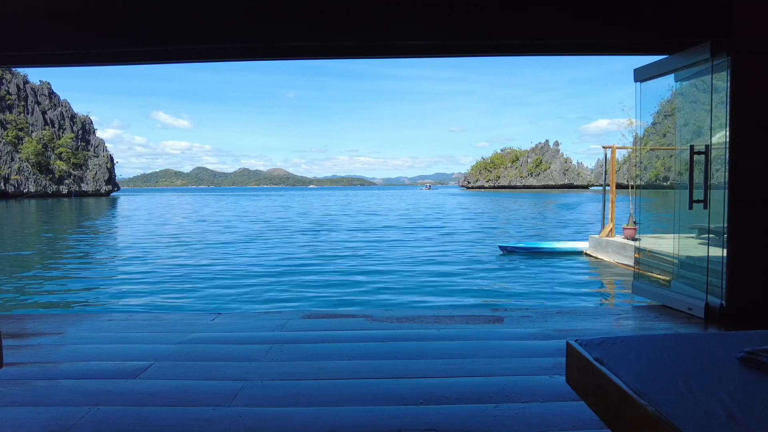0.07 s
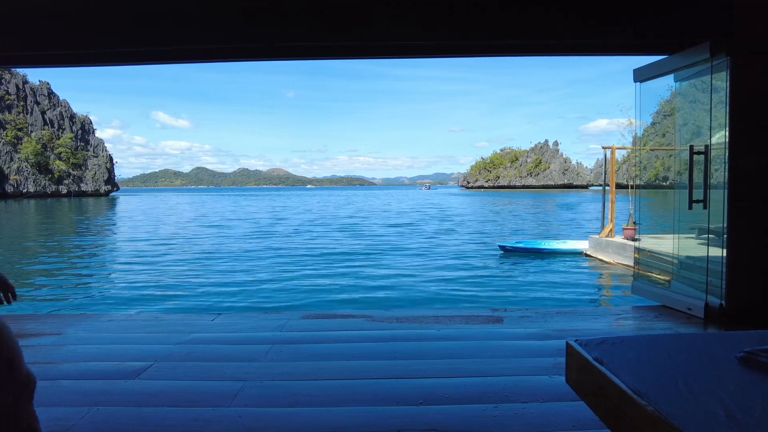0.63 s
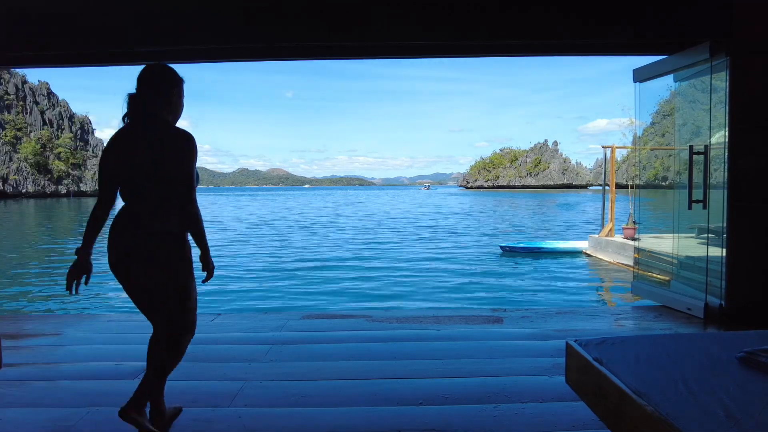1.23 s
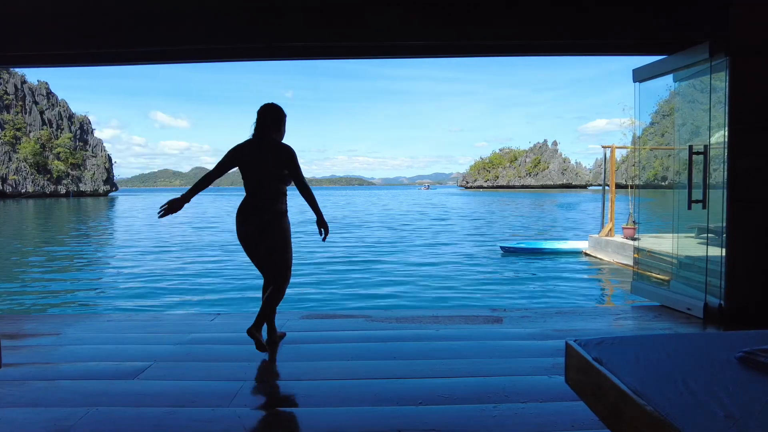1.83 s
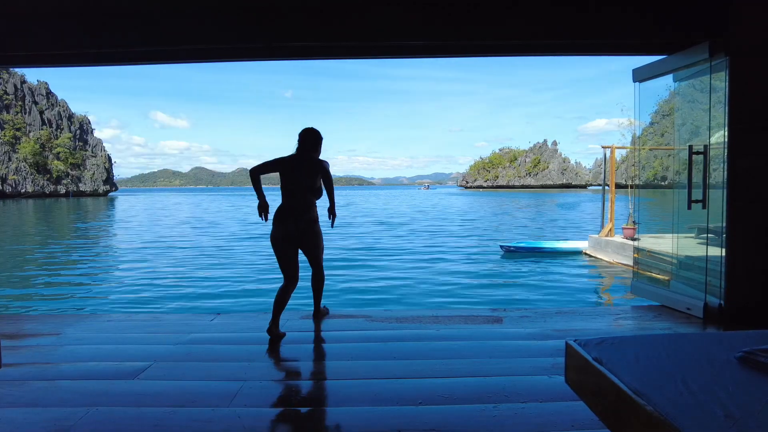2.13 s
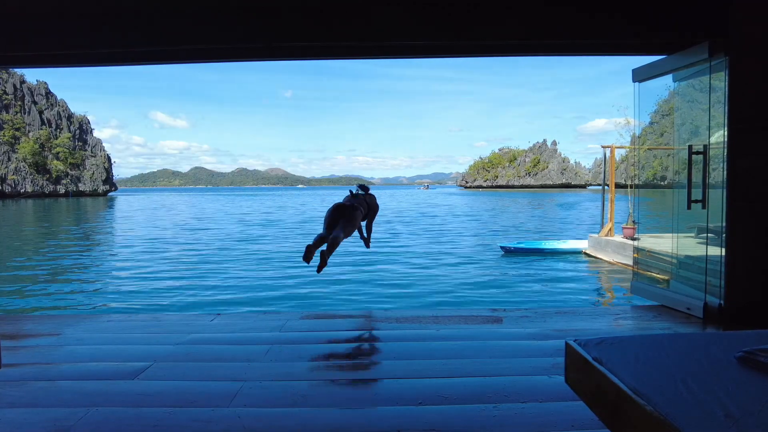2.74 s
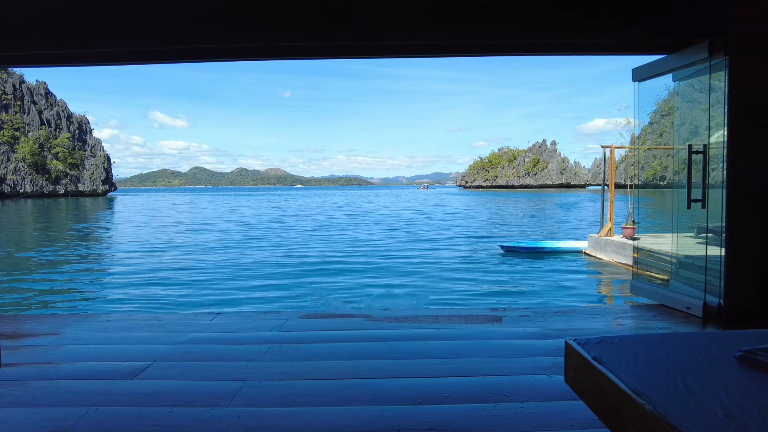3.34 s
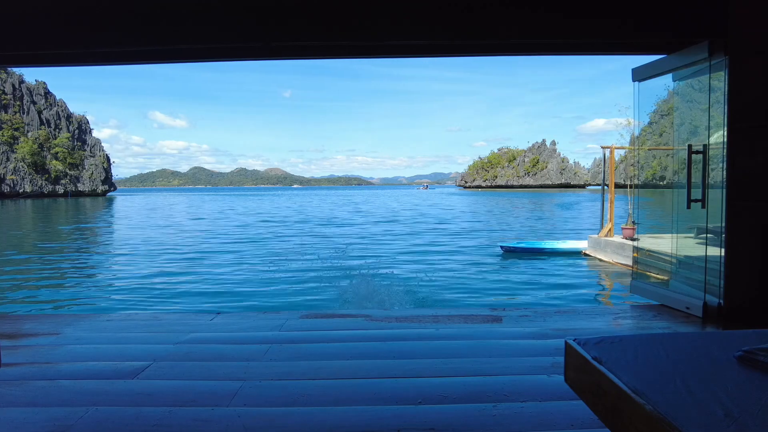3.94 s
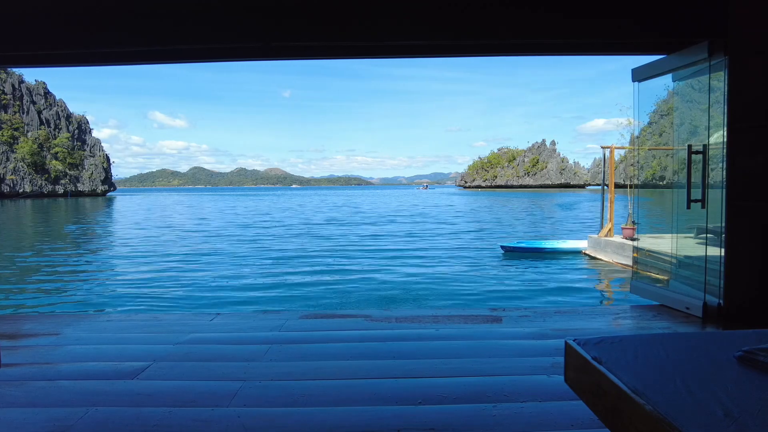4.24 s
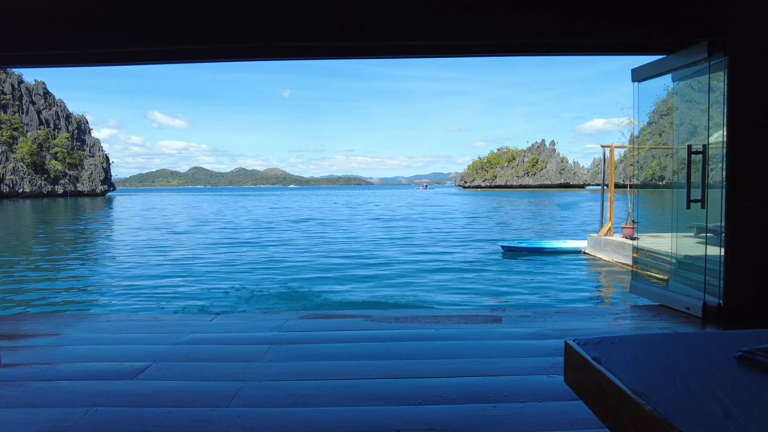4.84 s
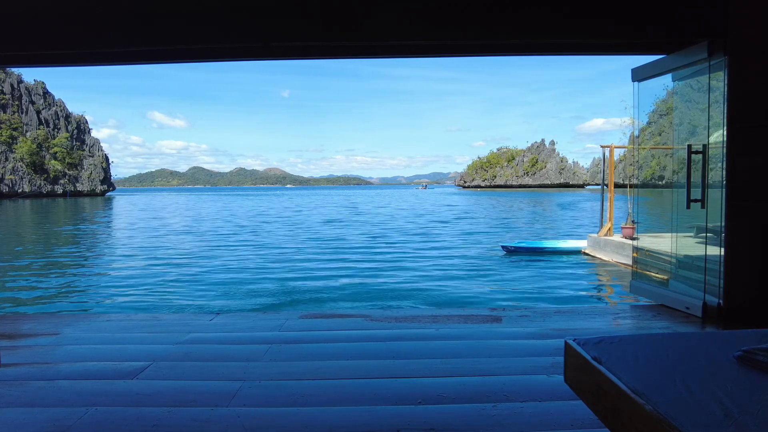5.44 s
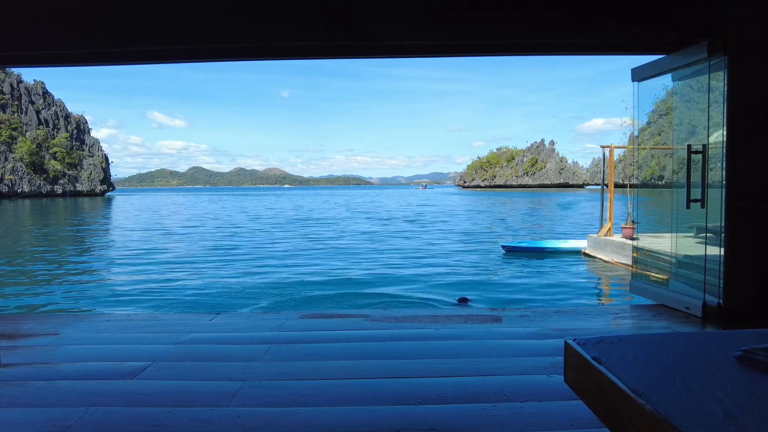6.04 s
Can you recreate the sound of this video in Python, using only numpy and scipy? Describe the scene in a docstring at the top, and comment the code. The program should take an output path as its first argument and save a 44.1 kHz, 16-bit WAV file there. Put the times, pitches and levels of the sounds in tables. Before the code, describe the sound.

Soft lapping under a wooden deck and a faint, low generator hum continue throughout. At about 0.2 to 0.4 seconds come sharp clacks, like something set down on the boards. From 0.7 seconds bare feet run across the deck with hollow thumps and light, wet slaps, heaviest around 1.9 to 2.3 seconds and ending near 2.8. At 3.1 seconds a diver slices into the water, and at 3.2 the air pocket claps shut with a loud, deep boom and gulp. More booms and gulps follow around 3.5 to 3.6 seconds amid churning bubbles. Spray rains back, swelling at about 4.3 to 4.5 seconds, then fades into fine fizzing foam. Scattered bubbles and small gurgles continue until about 6 seconds, with the hum slightly stronger around 5. The roof over the deck adds a short echo.

```python
"""A dive from a floating house

Sharp clacks sound, like something set down on a wooden deck; then bare feet run up and dive into a lagoon.
The body slices in, the air pocket behind it claps shut and gulps, spray rains back and foam fizzes out.
A generator hums faintly, wavelets lap under the boards, and the roof over the deck echoes."""
import sys
import numpy as np
from scipy import signal
from scipy.fft import rfft, irfft, next_fast_len
from scipy.io import wavfile
from scipy.ndimage import map_coordinates

SR = 44100
rng = np.random.default_rng(int(sys.argv[2]) if len(sys.argv) > 2 else 0)


def digitize_waveform(pressure):
    """Quantize a signal to 16-bit integers and store it at the path in sys.argv[1].

    Rows of a 2-D input are taken as channels; values are limited to [-1, 1].
    """
    field = np.atleast_2d(pressure).T
    bounded = np.clip(field, -1, 1)
    quanta = np.round(bounded * 32767).astype(np.int16)
    wavfile.write(sys.argv[1], SR, quanta)


N = 267863

# the air pocket behind the diver collapses: (time [s], boom level [dB], rise [s], clap level [dB])
COLLAPSES = [(3.2094, -4.5, 0.0058, -27.5), (3.447, -38, 0.011, -29.5), (3.486, -15, 0.0048, -32),
             (3.561, -10.5, 0.0091, -25)]
# stirred water boils over the diver, swells as spray rains back, then settles:
# (time [s], level [dB], fineness [dB]); low fineness means big bubbles, high means fine drops
WASH = [(3.12, -49.5, 6.5), (3.19, -38, -2.5), (3.3, -35.5, -2), (3.43, -40, -5), (3.5, -33.5, -2.5),
        (3.66, -40.5, -1.5), (3.8, -41, 1), (4.0, -44.5, 1.5), (4.3, -34, 1.5), (4.52, -37.5, 3.5),
        (4.65, -46, 1.5), (4.9, -50, -3), (5.08, -54, 0), (5.25, -60.5, 0.5), (5.65, -74.5, 6.5),
        (6.07, -82.5, 10)]
BUBBLE_T60, BUBBLE_GLIDE = 0.07, 0.18  # a t60 is the seconds taken to fade by 60 dB; pitch climbs 18 %
SLAP_RISE = 0.017  # rise as a share of length: a long scuff starts more softly than a tap


def amp(db):
    """Turn decibels into a gain."""
    return 10 ** (np.asarray(db) / 20)


def unit(x):
    """Scale to an average (rms) level of 1."""
    return x / np.sqrt(np.mean(x ** 2) + 1e-20)


def along(points, hz):
    """Read between (frequency, value) points on a log frequency scale."""
    freqs, values = np.transpose(points)
    return np.interp(np.log(hz + 1), np.log(freqs + 1), values)


def curves(rows):
    """One value per sample for each column after the time."""
    times, *columns = np.transpose(rows)
    return [np.interp(np.arange(N) / SR, times, column) for column in columns]


def wobble(rate):
    """A smooth curve through rate random values a second."""
    return map_coordinates(rng.standard_normal(int(N * rate / SR) + 4), [np.arange(N) * rate / SR])


def noise():
    """Two unrelated white noises."""
    return rng.standard_normal((2, N))


def add(track, s, sound):
    """Mix a sound into the track at s seconds."""
    part = track[..., round(s * SR):][..., :sound.shape[-1]]
    part += sound[..., :part.shape[-1]]


def filtered(x, response):
    """Multiply each frequency in x by response(hz)."""
    size = next_fast_len(N + SR // 4)
    return irfft(rfft(x, size) * response(np.fft.rfftfreq(size, 1 / SR)), size)[..., :N]


def fade(t60, rise):
    """A one-second loudness shape that rises quickly and dies away."""
    t = np.arange(SR) / SR
    return np.exp(-np.log(1000) * t / t60) * (1 - np.exp(-t / rise))


def ring(hz, t60, rise, glide=0):
    """A fading tone whose pitch climbs by the share glide."""
    t = np.arange(SR) / SR
    pitch = hz * (1 + glide * np.minimum(t / t60, 1))
    return fade(t60, rise) * np.sin(2 * np.pi * np.cumsum(pitch) / SR)


def spread(pair, colour, hollow_db=0):
    """Make two signals into stereo of level 1, shaped by a colour: (frequency [Hz], level [dB])."""
    # the gap under the deck rings, as much as hollow_db asks: (pitch [Hz], width [Hz], strength [dB])
    hollow = [(397.6, 68, 11), (508, 23, 2), (1013, 31, 9), (1236, 67, -3), (1458, 25, 2),
              (1737, 210, -8.5), (2636, 33, 0.5), (2960, 200, -12.5)]
    # how alike the two ears are: (frequency [Hz], likeness [0 to 1])
    likeness = [(100, .99), (300, 0.92), (550, 0.83), (1000, 0.33), (2000, 0.83), (4000, 0.28),
                (12000, 0.43)]

    def response(hz):
        angle = np.arccos(np.clip(along(likeness, hz), -1, 1)) / 2
        lift = sum(amp(db / 2) / (1 + (2 * (hz - centre) / width) ** 2) for centre, width, db in hollow)
        return amp(along(colour, hz) + hollow_db * lift) * [np.cos(angle), np.sin(angle)]
    mid, side = filtered(pair, response)
    return unit(np.array([mid + side, mid - side]))


def swarm(count, lo_hz, hi_hz, cycles, size_db, glide):
    """Two streams of bubbles at random times, each ringing for some cycles; size_db varies their level."""
    when, pitch, size, stream = rng.random((count, 4)).T
    hz = lo_hz * (hi_hz / lo_hz) ** pitch[:, None]
    samples = np.arange(int(cycles * SR / lo_hz) + 2)
    age = samples * hz / SR / cycles
    wave = np.sin(2 * np.pi * cycles * age * (1 + glide * age / 2)) * age * np.exp(-2 * np.pi * age)
    wave *= amp(-size_db * np.log(np.maximum(size, 1 / 100)))[:, None]
    start = (when * N).astype(int) + N * (stream > .5)
    summed = np.bincount((start[:, None] + samples).ravel(), wave.ravel(), 2 * N)
    return unit(summed[:2 * N].reshape(2, N))


def roof_echo(x):
    """Roof and walls echo 8 ms later; the open front lets the bass escape."""
    # how long the echo lasts: (frequency [Hz], t60 [s])
    decay = [(150, 0.33), (600, 0.32), (2500, 0.31), (12000, 0.25)]
    hz, t, spectrum = signal.stft(rng.standard_normal((2, SR // 2)), SR, nperseg=256)
    mid, side = signal.istft(spectrum * amp(-60 * t / along(decay, hz)[:, None]), SR, nperseg=256)[1]
    tail = mid + 0.76 * np.array([side, -side])
    echo = signal.fftconvolve(x.mean(axis=0)[None], tail / np.linalg.norm(tail[0]), axes=1)[:, :N]
    return filtered(echo, lambda hz: hz ** 2 / (hz ** 2 + 300 ** 2) * np.exp(-2j * np.pi * hz * .008))


def calm_lagoon():
    """Wavelets under the deck and distant air blend into a soft, even noise."""
    # its colour: (frequency [Hz], level [dB])
    colour = [(22, -6.5), (55, -1), (100, -2.5), (170, -12), (260, -30.5), (400, -25.5), (640, -18.5),
              (780, -35.5), (950, -31), (1150, -37.5), (1450, -35), (2200, -42), (5000, -46.5),
              (16000, -59)]
    return amp(-49.5 + 0.3 * wobble(5.02)) * spread(noise(), colour, hollow_db=4.5)


def generator():
    """A generator hums, now fainter, now louder, its pitch wandering slightly."""
    # the hum's tones: (pitch [Hz], level [dB])
    tones = [(55, -46.5), (110, -71.5), (166, -85)]
    # its swell: (time [s], gain [dB])
    swell = [(0, -7.5), (3, -4.5), (4.2, -4), (4.8, 1), (5.3, 0.5), (5.6, -7.5), (6.07, -1.5)]
    uneven_time = np.cumsum(1 + .01 * wobble(2)) / SR
    hum = sum(amp(db) * np.sqrt(2) * np.sin(2 * np.pi * hz * uneven_time) for hz, db in tones)
    return hum * amp(curves(swell)[0] + .5 * wobble(11))


def wavelets(bubbles_each):
    """Each wavelet traps a small cluster of bubbles of about one size."""
    # gurgles against the deck: (time [s], level [dB], pitch [Hz])
    gurgles = [(.135, -46, 560), (3.95, -42, 1950), (4.666, -38, 1080), (4.96, -40, 576), (5.17, -49, 1640),
               (5.235, -48, 600), (5.356, -47.5, 1500), (5.47, -49.5, 460), (5.72, -62.5, 3090),
               (5.79, -59, 1810), (5.86, -59, 910)]
    length_s, fall_db = 0.054, 5
    out = np.zeros(N)
    for s, db, hz in gurgles:
        for k in range(bubbles_each):
            age = (k + rng.random()) / bubbles_each
            pitch = hz * np.exp(.085 * rng.standard_normal())
            bubble = ring(pitch, BUBBLE_T60, rise=0.0026, glide=BUBBLE_GLIDE)
            add(out, s + age * length_s, amp(db - fall_db * age) * bubble)
    return out


def deck_thumps():
    """Each hit rings the deck at its own spot: a soft one moves the beams, a quick one the planks."""
    # an opening clack, then footsteps: (time [s], level [dB], hardness [Hz]); little rings above that
    hits = [(0.242, -25, 440), (0.737, -26, 37), (0.786, -29.5, 55), (.836, -27.5, 55.3), (1.167, -35, 40),
            (1.224, -31, 140), (1.516, -37.5, 69), (1.574, -40, 172), (1.697, -34, 45), (1.787, -32, 80),
            (1.852, -16.5, 159), (2.116, -29.5, 45), (2.218, -22, 111), (2.328, -24, 77.4),
            (2.64, -37, 168)]
    # the tones of beams and planks: (pitch [Hz], level [dB], t60 [s])
    deck = [(30.53, 5.5, 1), (41, -2.5, 0.3), (51.2, -14, 0.44), (68.66, -4, 1), (86.14, -1.5, 0.59),
            (101, -6, 0.34), (129, -2, 0.26), (170.8, -11, 0.61), (198.3, -10, 0.37), (222.4, -23.5, 0.67),
            (234, -20.5, 0.25), (314, -22, 0.29)]
    out = np.zeros(N)
    for s, db, hard_hz in hits:
        for hz, level, t60 in deck:
            drive = hz / np.hypot(hz, hard_hz / 4) / np.hypot(1, (hz / hard_hz) ** 2)
            spot_db, detune = rng.normal(0, min(hz / 60, 2.5)), rng.normal(1, .012)
            add(out, s, amp(db + level + spot_db) * drive * ring(hz * detune, t60, rise=0.0074))
    return out * amp([[-.8], [.8]])


def contact_hiss(hiss_hz, length):
    """The hiss of a touch on the boards: a quick snap, then a slower fade."""
    hz = np.fft.rfftfreq(SR, 1 / SR)
    colour = hz ** 2 / (hz ** 2 + 4000 ** 2) / np.hypot(1, (hz - hiss_hz) / (0.32 * hiss_hz))
    mid, side = irfft(rfft(rng.standard_normal((2, SR))) * colour, SR)
    snap = 0.5 * fade(t60=0.016, rise=0.00071)
    settle = fade(length * 0.73, rise=SLAP_RISE * length)
    return (snap + settle) * unit(mid + 0.8 * np.array([side, -side]))


def board_hits():
    """Each hit knocks, slaps and rings a board; the sharper it is, the less wood and the more hiss."""
    # sharp opening clacks, like something set down on the boards, then footsteps:
    # (time [s], level [dB], sharpness [dB], length [s])
    contacts = [(.237, -31.5, 6, 0.15), (.2524, -32, 4, 0.1), (.3632, -34.5, 5.5, 0.1),
                (.7677, -53, -10, 0.25), (1.159, -39.5, -0.5, 0.14), (1.213, -46.5, 1.5, .15),
                (1.3794, -48, 3, 0.11), (1.4867, -54.5, -4, 0.46), (1.79, -56, -7.5, 0.45),
                (1.858, -41, 4.5, .17), (2.1257, -49, -3.5, 0.28), (2.1955, -49, 4, 0.2),
                (2.3383, -49.5, 0.5, 0.28), (2.4646, -51, -6, 0.088), (2.634, -52, -14.5, 0.21),
                (2.679, -46, -8.5, 0.13), (2.774, -49, 2, 0.16)]
    # the tones of one struck board: (pitch [Hz], level [dB], t60 [s])
    board = [(387.5, -9.5, 0.51), (624, -5, 0.16), (639, 3.5, 0.16), (941, -7, 0.16), (1012, -9, 0.24),
             (1290, -27, 0.17), (1380, -7.5, 0.24), (2780, -21, 0.058), (2950, -4, 0.036),
             (3110, -25, 0.057)]
    knock, slap, wood = np.zeros((3, N))
    hiss = np.zeros((2, N))
    for s, db, sharp_db, length in contacts:
        add(knock, s, amp(db - 1.5 - sharp_db) * fade(length * 1.76, rise=0.0044))
        add(slap, s, amp(db - 7) * fade(length, rise=SLAP_RISE * length))
        add(hiss, s, amp(db - 14.5 + sharp_db) * contact_hiss(4000 + 110 * sharp_db, length))
        wood_db = db - 7.5 - 0.54 * sharp_db
        for hz, level, t60 in board:
            spot_db, detune = rng.normal(0, 2.5), rng.normal(1, .03)
            add(wood, s, amp(wood_db + level + spot_db) * ring(hz * detune, t60, rise=0.0039))
    knock_colour = [(105, 3.5), (170, 6), (250, -5.5), (380, 3), (490, -1.5), (640, 0), (800, -11.5),
                    (1500, -43)]
    slap_colour = [(500, -28), (720, 2), (870, -6.5), (1030, -0.5), (1170, 0.5), (1380, 4), (1900, -4),
                   (2900, -4), (4200, -9.5), (8000, -48)]
    return wood + hiss + knock * spread(noise(), knock_colour) + slap * spread(noise(), slap_colour)


def wet_soles():
    """Bright wet hisses, as a sole slaps down or peels off the boards."""
    # each hiss: (time [s], level [dB], centre [Hz], length [s])
    hisses = [(.885, -57, 9400, .07), (1.378, -53.5, 12000, 0.063), (1.458, -52, 6160, 0.28),
              (1.863, -58, 12100, 0.06), (2.693, -55.5, 5750, .14), (2.835, -62, 11000, .085)]
    out = np.zeros((2, N))
    for s, db, hiss_hz, length in hisses:
        add(out, s, amp(db) * contact_hiss(hiss_hz, length))
    return out


def stray_bubbles(count):
    """Single bubbles surface after the dive; they weaken more slowly than the wash, so they stand out."""
    lo_hz, hi_hz = 466, 2460
    out = np.zeros((2, N))
    wash_db = curves(WASH)[0]
    first_s = COLLAPSES[0][0]
    for when, pitch, size, side in rng.random((count, 4)):
        s = first_s + when * (N / SR - first_s)
        hz = lo_hz * (hi_hz / lo_hz) ** pitch
        db = -12 + .62 * wash_db[int(s * SR)] - 9 * size
        pan_db = 8.3 * (side - .5) * np.array([[1], [-1]])
        add(out, s, amp(db + pan_db) * ring(hz, BUBBLE_T60, rise=0.0017, glide=BUBBLE_GLIDE))
    return out


def foam():
    """The finest foam bursts with a high fizz."""
    # the fizz swells and fades: (time [s], level [dB])
    fizz = [(3.12, -82), (4.5, -60), (5.1, -67.5), (6.07, -68.5)]
    return amp(curves(fizz)[0]) * spread(noise(), [(4000, -8), (9000, -6), (15000, -10)])


def splash():
    """Churning bubbles, falling drops and mist merge into a wash; each collapse throws up a burst."""
    # the colours of bubbles, drops and mist: (frequency [Hz], level [dB])
    bubble_colour = [(200, -4.5), (300, -19), (385, -15.5), (540, 0), (660, 1), (790, -7), (1200, -40)]
    drop_colour = [(650, -28), (870, -14), (1050, -10.5), (1500, -3), (2100, -6), (2900, -5), (3700, -11),
                   (6000, -24.5)]
    mist_colour = [(2500, -18), (4000, -5.5), (6500, -6.5), (9500, -9), (11500, -13), (16000, -12)]
    wash_db, fine_db = curves(WASH)
    burst = np.zeros(N)
    for s, db, _, _ in COLLAPSES:
        add(burst, s, amp(db) * fade(t60=0.25, rise=0.0055))
    bubbles = swarm(count=5000, lo_hz=283, hi_hz=858, cycles=10.2, size_db=0, glide=0.16) + noise()
    drops = swarm(count=7000, lo_hz=844, hi_hz=3953, cycles=25, size_db=0.8, glide=0.086) + 2.7 * noise()
    mist = swarm(count=30000, lo_hz=2650, hi_hz=14600, cycles=3.2, size_db=0.5, glide=0) + 1.68 * noise()
    bubble_gain = np.hypot(amp(wash_db - 1.5 - 1.3 * fine_db + 1.07 * wobble(22)), amp(-13.5) * burst)
    drop_gain = np.hypot(amp(wash_db - 0.5), amp(-17.5) * burst)
    mist_gain = np.hypot(amp(wash_db - 3.5 + fine_db), amp(-26.5) * burst)
    return (bubble_gain * spread(bubbles, bubble_colour, hollow_db=6)
            + drop_gain * spread(drops, drop_colour, hollow_db=5.5)
            + mist_gain * spread(mist, mist_colour))


def plunge():
    """The air pocket claps shut and pulses as one huge bubble; water heaves and bubbles break away."""
    # the biggest single bubbles: (time [s], level [dB], pitch [Hz])
    gulps = [(1.381, -34.5, 634), (3.208, -18, 876), (3.212, -4.5, 520), (3.216, -19, 328.4),
             (3.345, -22, 573), (3.493, -11, 556), (3.566, -11.5, 594), (3.571, -11, 359),
             (3.573, -20.5, 1046), (3.594, -10.5, 391), (3.597, -23, 1432), (3.655, -21.5, 531),
             (4.08, -24.5, 456), (4.511, -22.5, 1622), (4.783, -31.5, 420), (4.846, -24.5, 619)]
    tones, claps, heaves = np.zeros((3, N))
    for s, db, rise, clap_db in COLLAPSES:
        add(tones, s, amp(db) * ring(hz=50.4, t60=.19, rise=rise, glide=0.027))  # the pocket pulses
        add(tones, s, amp(clap_db + 5.5) * ring(hz=105.6, t60=0.2, rise=0.0041))  # a second, higher tone of the boom
        add(claps, s, amp(clap_db) * fade(t60=0.32, rise=0.005))
        add(heaves, s, amp(clap_db - 6) * fade(t60=0.76, rise=0.0023))
    for s, db, hz in gulps:
        add(tones, s, amp(db) * ring(hz, BUBBLE_T60, rise=0.0051, glide=BUBBLE_GLIDE))
    clap_colour = [(150, 4), (320, 6.5), (400, 12), (550, -1.5), (900, -6), (1500, 2), (3000, -18.5),
                   (5000, -10.5), (15000, -23)]
    heave_colour = [(20, 14.5), (55, 8), (78, -10), (100, 16), (135, -8), (165, 4), (220, -7),
                    (330, -44.5)]
    clap = spread(noise(), clap_colour, hollow_db=5)
    heave = spread(noise(), heave_colour)
    return tones + claps * clap + heaves * heave


def scene():
    """Clacks and steps under the roof, then the dive out in the open, over a quiet background."""
    entry_s, entry_rise_s = 3.119, 0.0013  # the hands cut the surface
    entered = np.clip((np.arange(N) / SR - entry_s) / entry_rise_s, 0, 1)
    deck = deck_thumps() + board_hits() + wet_soles()
    water = entered * (splash() + foam()) + plunge() + stray_bubbles(count=36) + wavelets(bubbles_each=6)
    delay_s = np.array([[0], [.00003]])  # the deck's sounds reach the left ear first
    direct_deck = filtered(deck, lambda hz: np.exp(-2j * np.pi * hz * delay_s))
    echoes = amp(-7) * roof_echo(deck) + amp(-9) * roof_echo(water)
    return direct_deck + water + echoes + calm_lagoon() + generator()


def record(dry):
    """Cut the highest treble, above 15900 Hz."""
    return filtered(dry, lambda hz: hz < 15900)


dry = scene()
out = record(dry)
digitize_waveform(out)
```